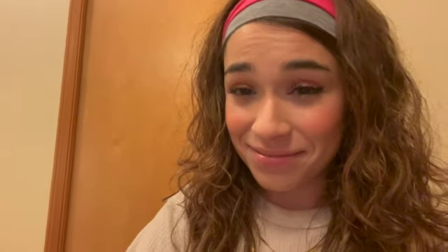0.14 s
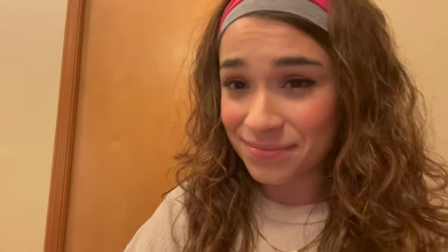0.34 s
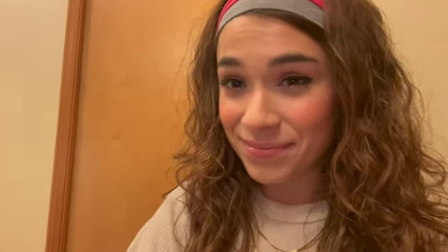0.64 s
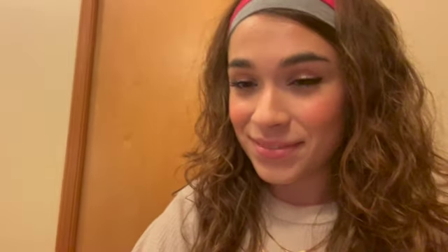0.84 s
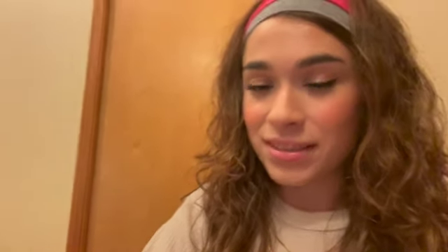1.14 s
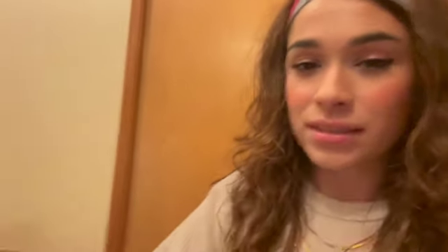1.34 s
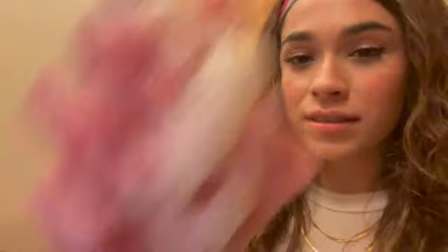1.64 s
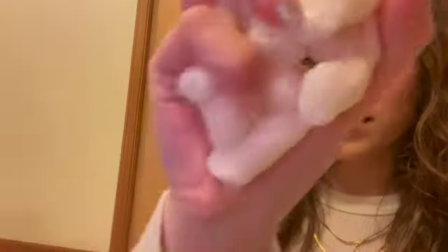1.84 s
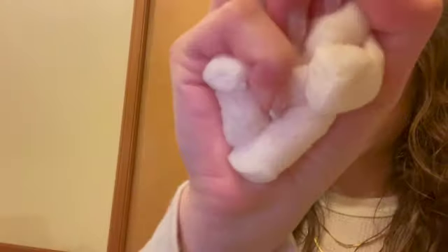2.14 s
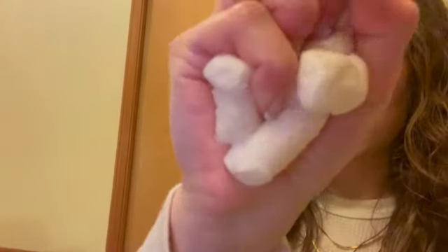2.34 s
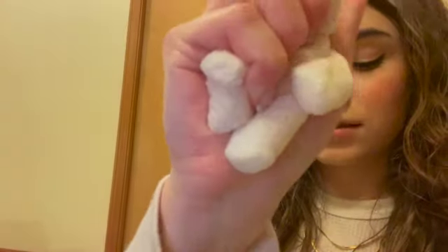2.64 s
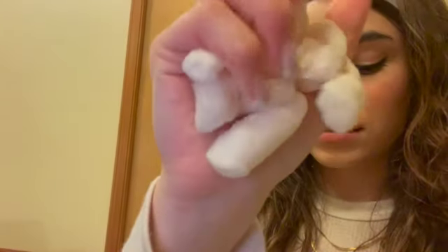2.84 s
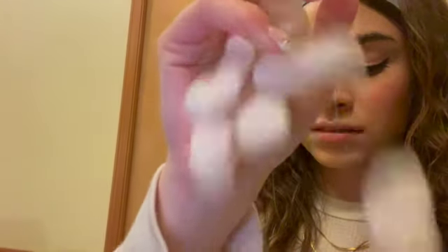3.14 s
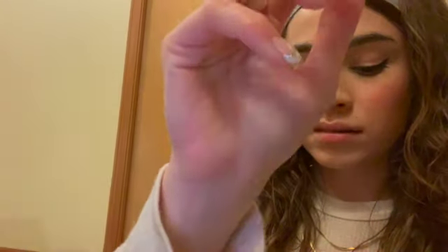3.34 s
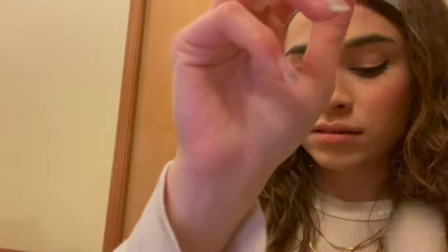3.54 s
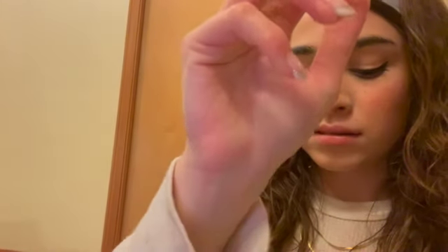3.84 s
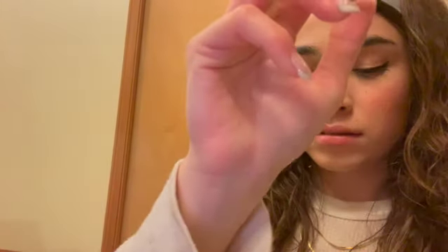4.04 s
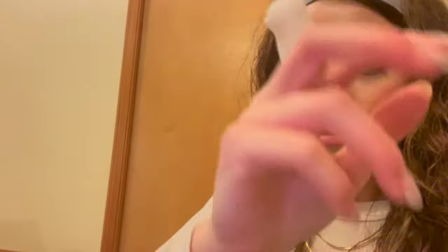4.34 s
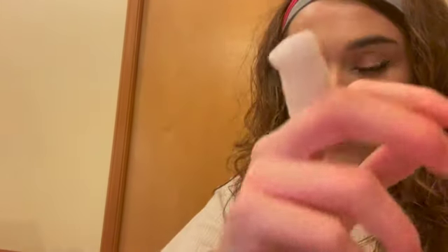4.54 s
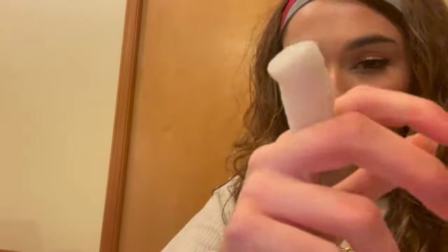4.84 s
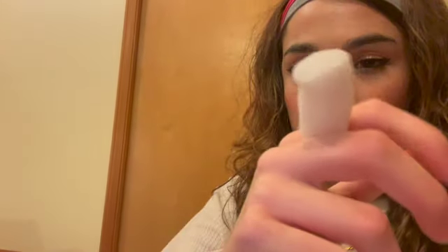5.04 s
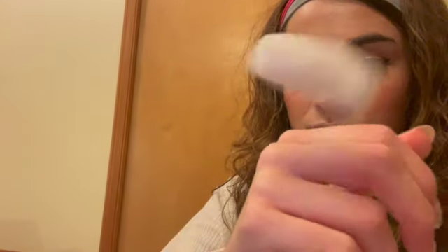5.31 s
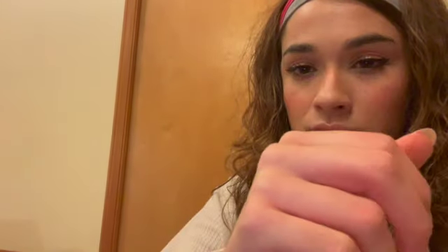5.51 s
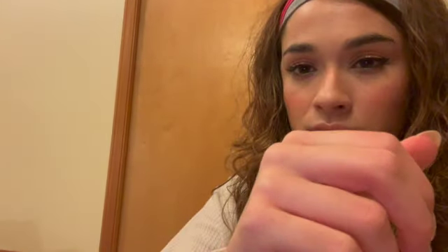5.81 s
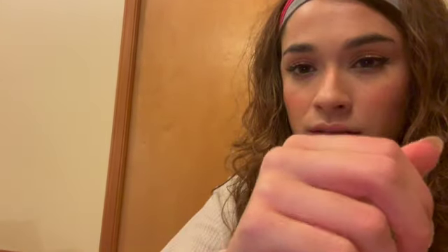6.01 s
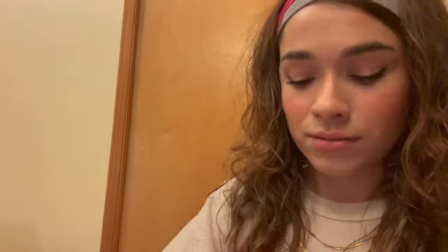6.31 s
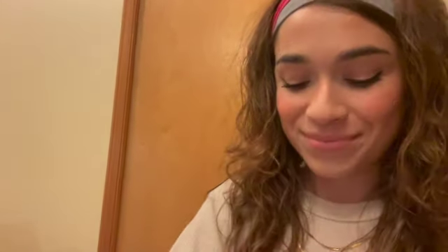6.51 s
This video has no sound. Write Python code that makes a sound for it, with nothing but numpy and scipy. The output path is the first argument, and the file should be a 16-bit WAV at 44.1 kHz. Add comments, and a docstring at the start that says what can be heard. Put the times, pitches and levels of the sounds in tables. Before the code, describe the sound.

Dry, hollow rummaging in a box of light foam pieces comes first, then a handful is crushed right at the microphones, muffled at first and quickly turning into crisp, dense crunching and popping. It eases, and a rapid shower of light pieces taps the cardboard. Quiet follows, with faint brushing, a tiny peel and one hollow tap. A final rustle and soft low table knock end it, over faint hiss in a small indoor room.

```python
"""Crushing foam packing peanuts

A hand rummages in a box of foam peanuts (grains of noise and box modes), lifts a handful to two microphones
and crushes it (dense bright clicks, snaps, a hollow fist). The peanuts drop back as ticks that ring the box;
a last one sticks to the skin, peels off and falls; the hand digs in again and the wrist knocks the table.
Movement adds shaped low noise and a thrum; decaying noise makes the small room, faint hiss its background."""
import sys
import numpy as np
from scipy import signal
from scipy.fft import rfft, irfft
from scipy.io import wavfile

SR = 44100
rng = np.random.default_rng(int(sys.argv[2]) if len(sys.argv) > 2 else 0)


def master(y):
    """Save y as 16-bit WAV."""
    cut = np.clip(np.atleast_2d(y).T, -1, 1)
    pcm = np.round(cut * 32767)  # scale
    wavfile.write(sys.argv[1], SR, pcm.astype(np.int16))


N = 294147


def from_db(db):
    """Decibels to an amplitude factor."""
    return 10 ** (np.asarray(db) / 20)


def rms_one(x):
    """Scales a signal to an RMS of 1."""
    return x / np.sqrt(np.mean(x ** 2) + 1e-20)


def in_time(spans):
    """Columns of several tables on one time line; level is silence between the tables."""
    t = np.arange(N) / SR
    out = np.zeros((len(spans[0][0]) - 1, N))
    out[0] = -140
    for rows in spans:
        s, *columns = np.transpose(rows)
        inside = (t >= s[0]) & (t <= s[-1])
        out[:, inside] = [np.interp(t[inside], s, c) for c in columns]
    return out


def swells(rows):
    """Power of overlapping events that rise to a peak and fall away at steady dB rates."""
    out = np.zeros(N)
    for s, db, *times in rows:
        rise, fall = np.clip(times, .001, 1.5)      # seconds per 10 dB
        first = max(round((s - 6 * rise) * SR), 0)
        last = min(round((s + 6 * fall) * SR), N)
        i = np.arange(first, last)
        tens_of_db_down = np.where(i < s * SR, (s - i / SR) / rise, (i / SR - s) / fall)
        out[i] += 10 ** (db / 10 - tens_of_db_down)
    return out


def colour(x, points):
    """Causal (minimum-phase) filter that follows a spectrum in dB."""
    size = 8192
    hz, level_db = np.transpose(points)
    bin_hz = np.arange(size // 2 + 1) * SR / size
    curve_db = np.interp(np.log(bin_hz + 1), np.log(hz), level_db)
    # folding the cepstrum onto positive time gives the minimum phase
    cepstrum = irfft(curve_db * np.log(10) / 20)
    cepstrum[1:size // 2] *= 2
    cepstrum[size // 2 + 1:] = 0
    response = irfft(np.exp(rfft(cepstrum)))
    response = response.reshape((1,) * (x.ndim - 1) + (-1,))
    return signal.fftconvolve(x, response, axes=-1)[..., :x.shape[-1]]


def tilt(x, bright_db, split_hz):
    """Raises or lowers what lies above the split."""
    low = signal.sosfilt(signal.butter(1, split_hz, fs=SR, output="sos"), x)
    return low + from_db(bright_db) * (x - low)


def drift(rate_hz):
    """Slow random wander of RMS 1: noise through two equal one-pole lowpasses."""
    r = np.exp(-2 * np.pi * rate_hz / SR)
    noise = rng.standard_normal(N + SR)
    return rms_one(signal.lfilter([1], [1, -2 * r, r * r], noise)[SR:])


def ring(clicks, hz, t60):
    """A unit click sets a decaying sine of starting height 1 ringing."""
    r = from_db(-60 / (t60 * SR))
    w = 2 * np.pi * hz / SR
    return signal.lfilter([0, np.sin(w)], [1, -2 * r * np.cos(w), r * r], clicks + 1e-18)


WANDER_S = .0012      # spread of the reading time


def bend(x):
    """Reading a sound at a slowly wandering time bends its pitch by a few per cent."""
    at = np.arange(N) + WANDER_S * SR * drift(4)
    return np.array([np.interp(at, np.arange(N), side) for side in x])


def place(x, lag_s, pan_db):
    """A point source at two microphones: left lags right, with a left-right level difference."""
    shifts = [12 + round(side * lag_s * SR / 2) for side in (1, -1)]
    sides = np.array([np.pad(x, (k, 0))[:len(x)] for k in shifts])
    return sides * from_db([[pan_db / 2], [-pan_db / 2]])


def grains(per_s, grain_db, lag_s, spread_s, spread_db, count=8):
    """Random clicks of uneven size, each from one of several spots between the microphones."""
    steep = np.clip(grain_db, 0, 4) * np.log(10) / 20
    sizes = np.exp(steep * np.minimum(rng.exponential(1, N), 6))
    sizes = sizes * np.sqrt(1.05 - 2 * steep)      # offsets the power that unevenness adds
    clicks = sizes * rng.choice([-1, 1], N) * (rng.random(N) < per_s / SR)
    spot = rng.integers(0, count, N)
    where = np.linspace(-1, 1, count)
    return sum(place(clicks * (spot == k), lag_s + spread_s * w, spread_db * w)
               for k, w in enumerate(where))


def steady(spectrum, apart):
    """Smooth coloured noise: one shared part and a share `apart` of each side's own."""
    white = rng.standard_normal((3, N))
    return rms_one(colour(white[0] + apart * white[1:], spectrum))


# colour of the background hiss: f/Hz, level/dB
AIR_COLOUR = [(18, -38), (30, -10.5), (109, -2.5), (184, -9), (287, -7), (632, -13), (1040, -15.5),
              (1400, -25.5), (2500, -31.5), (4500, -31), (8000, -28), (12500, -28.5), (16000, -49)]
AIR_DB = -76


def air():
    """Steady background hiss: coloured noise, a little more shared than separate on the two sides."""
    return from_db(AIR_DB) * steady(AIR_COLOUR, apart=0.86)


# movement felt at the microphones: t/s, deep rumble level/dB, boxy low-mid level/dB
RUMBLE = [(0.0, -48, -52), (0.2, -60.5, -78), (0.31, -48, -57), (0.41, -58, -87), (0.9, -53, -58),
          (1.06, -58, -69), (1.25, -51, -62.5), (1.45, -57, -63), (1.89, -52.5, -59), (2.64, -66.5, -76),
          (3.07, -59, -73), (3.58, -55, -53.5), (3.9, -58, -70), (3.96, -69, -78.5), (4.6, -75, -79),
          (5.2, -80, -85.5), (5.36, -67.5, -76), (5.89, -65, -71), (6.33, -68, -85), (6.5, -58, -67),
          (6.67, -55, -68)]
# colour of the deep rumble: f/Hz, level/dB
DEEP_COLOUR = [(18, -45.5), (28, -18.5), (40, -1), (59, 4), (108, 0), (190, -11.5), (250, -40), (420, -120)]
# colour of the boxy low mids: f/Hz, level/dB
BOXY_COLOUR = [(150, -36), (220, -9), (300, -0.5), (400, -9.5), (600, -13.5), (1200, -52)]
LUMPS_DB, LUMPS_RATE_HZ = 1, 19      # unevenness of the rumble
# every landing also booms in the box: dB under its peak, time to fall 10 dB
LANDING_BOXY_DB, LANDING_BOXY_FALL_S = -31.5, 0.1


def rumble():
    """Movement as low noise: a deep layer, and boxy low mids that swell with shoves and landings."""
    lumps = np.array([drift(LUMPS_RATE_HZ), drift(LUMPS_RATE_HZ)])
    deep_db, boxy_db = in_time([RUMBLE]) + LUMPS_DB * lumps
    shoved = swells([(s, boxy_peak_db, rise, fall) for s, _, rise, fall, boxy_peak_db in SHOVES])
    landed = swells([(s, db + LANDING_BOXY_DB, .003, LANDING_BOXY_FALL_S) for s, db, *_ in DROPS])
    deep = steady(DEEP_COLOUR, apart=.3) * from_db(deep_db + [[1.2], [-1.2]])
    boxy_gain = np.sqrt(from_db(2 * boxy_db) + shoved + landed)
    boxy = steady(BOXY_COLOUR, apart=.6) * boxy_gain * from_db([[1.0], [-1.0]])
    return deep + boxy


# hand stirring in the box, two passages: t/s, level before tilt/dB, brightness/dB
STIR = [
    [(0.0, -39, -4.5), (0.2, -47.5, -7), (0.37, -46, -4), (0.45, -39, -8), (0.7, -42.5, -11),
     (0.87, -45.5, -3.5), (1.0, -42, -7), (1.1, -44, -2), (1.2, -68, -4.5), (1.3, -51, -1), (1.4, -56.5, 4),
     (1.5, -49.5, 2.5)],
    [(6.28, -75, -0.5), (6.356, -71.5, 3), (6.39, -64.5, 8), (6.66, -62, 4)],
]
# shoves into the heap: t/s, peak level before tilt/dB, time to rise 10 dB/s, time to fall 10 dB/s
# (both times limited to .001-1.5 s), peak level of the boxy low mids/dB
SHOVES = [(0.082, -34.5, 0.025, 0.0872, -70), (0.172, -45, -0.9, 0.19, -70),
          (0.227, -37.5, 0.05, 0.09, -49), (0.29, -34.5, 0, 0.0352, -42), (0.319, -32.5, 0.01, 0.0235, -54),
          (0.544, -38, 0.04, 0.08, -80), (0.59, -39, 0.05, 0.07, -79), (0.622, -52, 0.5, 0.057, -78),
          (0.744, -34, 0, 0.07, -48), (0.764, -35, 0.05, 0.0745, -53), (0.822, -51, -0.34, 0.11, -57),
          (1.08, -49, 0.08, 0.1, -78), (1.132, -32.5, 0.06, 0.0836, -51.5),
          (6.381, -53.5, 0.0283, 0.1, -56.5), (6.552, -57, 0.11, -0.1, -62), (6.626, -53.5, 0.1139, 5, -56)]
# colour of contacts in the heap: f/Hz, level/dB
HEAP_COLOUR = [(110, -46.5), (180, -28), (280, -16.5), (450, -11), (730, -2.5), (1100, -5.5), (1500, -2.5),
               (2600, -3.5), (3000, -6), (5000, -8), (7500, -8.5), (10500, -17), (13000, -17), (16000, -42)]
# modes of the hollow cardboard box, each use varies the level and scales the ring: f/Hz, level/dB, t60/s
BOX = [(300, -6, .05), (430, -7, .04), (545, -2, .05), (640, -4, .035), (735, -2, .035), (845, -3, .035),
       (980, -6, .03), (1150, -6, .03), (1350, -5, .03), (1600, -8, .025), (1910, -8, .025),
       (2170, -8, .02), (2550, -10, .02), (3000, -13, .015), (3900, -15, .012)]
# rustle after every landing, a quick and a slow part: level against the landing's peak/dB (before the
# tick's share and tilt), time to fall 10 dB/s
SETTLE = [(-24, 0.024), (-31.5, 0.17)]
SETTLE_BRIGHT_DB = 5.5
SETTLE_FOLLOWS_TICK = 0.34      # dB per dB of tick: a scuffing landing stirs the heap more than a dull one
BOX_LAG_S = .00007      # arrival at the left microphone after the right
HAND_DAMPS = .6         # share of each box mode's t60 left under the hand


def rummage():
    """Countless soft contacts in the heap; as the hand moves about, other box modes answer."""
    level_db, bright_db = in_time(STIR)
    stirred = np.sqrt(from_db(2 * level_db) + swells([row[:4] for row in SHOVES]))
    settling_power = 0
    for under_db, fall in SETTLE:
        settling_power += swells([(s, db + under_db + SETTLE_FOLLOWS_TICK * tick_db, .001, fall)
                                  for s, db, _, tick_db, *_ in DROPS])
    contacts = colour(grains(5000, 1.3, BOX_LAG_S, .00008, 2.1), HEAP_COLOUR)
    contacts = contacts * from_db(.7 * drift(40))
    hollow = 0
    for hz, db, t60 in BOX:
        wandering_gain = from_db(db + 2.5 * drift(14))
        hollow = hollow + wandering_gain * bend(ring(contacts, hz, t60 * HAND_DAMPS))
    sound = rms_one(rms_one(contacts) + 0.49 * rms_one(hollow)) * from_db([[1.1], [-1.1]])
    stirring = tilt(sound, bright_db, 3000) * stirred
    settling = tilt(sound, SETTLE_BRIGHT_DB, 5200) * np.sqrt(settling_power)
    return stirring + settling


ROOM_T60_S, WALL_CUT_HZ, ROOM_DB = 0.34, 9000, -9.5


def room(x):
    """Decaying noise as the room's answer, one for each microphone, dulled by the walls."""
    t = np.arange(SR // 2) / SR
    answer = rng.standard_normal((2, len(t))) * from_db(-60 * t / ROOM_T60_S) * (t > .004)
    answer = signal.sosfilt(signal.butter(1, WALL_CUT_HZ, fs=SR, output="sos"), answer)
    answer = answer / np.sqrt(np.sum(answer ** 2) / 2)
    return from_db(ROOM_DB) * signal.fftconvolve(x, answer, axes=1)[:, :N]


# peanuts landing: t/s, peak level before panning/dB, pitch of the spot f/Hz, tick level against the
# box ring/dB, left-right level/dB, contact/s, ring length as a multiple of each box mode's t60
DROPS = [(0.742, -28.5, 740, -16, 9, 0.0096, 1.1), (1.343, -34, 1130, -3.5, -4, 0.0043, .9),
         (1.41, -38, 1360, 5, -14, 0.0036, .9), (3.113, -47.5, 980, -7, -6, .003, .9),
         (3.131, -38, 1080, -3, -6, 0.0025, .9), (3.143, -38, 2340, 6, -3, 0.0035, .9),
         (3.173, -41, 3310, 5, -7, 0.0068, .9), (3.194, -24, 870, -3.5, 1, 0.0016, .9),
         (3.273, -36, 900, -9, -4, 0.0022, .9), (3.291, -37, 2900, -1, 0, 0.0028, .9),
         (3.329, -37, 2460, 3, -11, 0.0077, .4), (3.338, -24.5, 840, -9.5, 12, 0.0014, .6),
         (3.345, -34, 403, -15, -2, 0.0027, .9), (3.359, -25.5, 700, -6.5, 6.5, 0.007, 1.2),
         (3.371, -40, 430, -8, 5, 0.0028, .9), (3.377, -30, 754, -14, 7, 0.0027, .9),
         (3.382, -30.5, 880, -2.5, -11, 0.0039, .9), (3.416, -32, 855, -1, -13, 0.006, .9),
         (3.423, -28, 750, -6, 10.5, 0.0031, .8), (3.434, -35, 1470, -18, -6, 0.004, .9),
         (3.484, -34.5, 453, -5.5, -1, 0.0027, .9), (3.52, -34, 2260, 3, -1, 0.0045, .9),
         (3.535, -31.5, 764, 0.5, 3, 0.0086, .9), (3.554, -31, 730, -4, 1, 0.0061, .9),
         (3.563, -33.5, 640, 4.5, 3, 0.0032, .9), (3.577, -33.5, 834, -4, -4, 0.0017, .9),
         (3.646, -37.5, 2300, -1, 1, 0.0046, .9), (3.844, -32, 580, -8.5, 1.5, 0.0027, 1.6),
         (3.872, -42.5, 600, -21.5, -1, 0.0041, 1.2), (3.892, -42, 755, -20, 5, 0.0018, .7),
         (3.919, -50, 600, -19.5, 0, .002, .8), (3.949, -41.5, 2030, 1, -1, 0.0033, 1.8),
         (3.958, -47, 2110, 0, 3, 0.0049, 1.5), (3.964, -45, 902, -5, 0, .002, .9),
         (5.619, -30, 746, 4.5, 1, 0.002, 1.1), (5.637, -43, 650, -5, -5, 0.0056, 1.3),
         (5.652, -39.5, 810, -5, 5, 0.0025, 1.4), (5.665, -42, 804, -12, 0, 0.0049, 1.3),
         (5.677, -48, 865, -8, -3, 0.0033, 1.4), (5.70, -51, 695, -10, 2, 0.0054, 1.4),
         (5.721, -53, 800, 0, 1, 0.0067, 1.1), (5.809, -57, 2560, 9, 2, 0.0036, .9),
         (5.855, -56, 2480, 5, 12, 0.0038, .9), (5.88, -48.5, 2430, 0.5, 0, 0.0037, 1.2),
         (6.363, -37.5, 810, 2, -2, 0.0041, .9), (6.376, -34.5, 800, -6, 8, 0.0056, 1.3),
         (6.385, -35.5, 2420, -1, -5, 0.004, .9)]
# colour of the bare tick: f/Hz, level/dB
SCUFF_COLOUR = [(200, -84.5), (900, -6), (2500, 13), (5000, 1.5), (12500, -9), (16000, -29)]


def drops():
    """A landing is a scuffing tick that strikes the box modes, most strongly near the pitch of its spot."""
    length = 6000
    out = np.zeros((2, N + length))
    t = np.arange(length) / SR
    light = signal.butter(2, 190, "high", fs=SR, output="sos")      # a peanut is too light to push the lows
    for s, peak_db, spot_hz, tick_db, pan_db, contact_s, lasts in DROPS:
        fade = np.exp(-t / np.clip(contact_s, .0008, .02))
        onset = 1 - np.exp(-t / np.clip(.3 * contact_s, .0006, .003))
        shared, *own_side = rng.standard_normal((3, length)) * fade * onset
        # the two microphones see the box from different sides
        tick = signal.sosfilt(light, shared + .9 * np.array(own_side))
        strengths_db = 1.8 * rng.standard_normal((len(BOX), 2, 1))
        detune = np.exp(.025 * rng.standard_normal())      # the shifting heap detunes the walls a little
        hit = 0
        for (hz, db, t60), own_db in zip(BOX, strengths_db):
            gain = from_db(db + own_db - 22 * abs(np.log2(hz / spot_hz)))
            hit = hit + gain * ring(tick, hz * detune, t60 * np.clip(lasts, .3, 4))
        scuff = colour(tick, SCUFF_COLOUR)
        hit = hit / np.abs(hit).max() + from_db(tick_db) * scuff / np.abs(scuff).max()
        i = round(s * SR)
        side_db = peak_db + pan_db * np.array([[.5], [-.5]])
        out[:, i:i + length] += hit / np.abs(hit).max() * from_db(side_db)
    return out[:, :N]


# a low thrum swells while the arm moves: t/s, peak level/dB, time to rise 10 dB/s, time to fall 10 dB/s
THRUMS = [(1.32, -51, .2, 0.14), (3.44, -58, .1, .2), (5.88, -63, 0.14, .08)]
THRUM_HZ, THRUM_STAGE_T60_S = 115.3, 0.19      # t60 of each of two resonators in a row


def thrum():
    """Noise ringing twice over in one low resonance, mostly shared by both microphones."""
    white = rng.standard_normal((3, N))
    once = ring(white[0] + .5 * white[1:], THRUM_HZ, THRUM_STAGE_T60_S)
    twice = ring(once, THRUM_HZ, THRUM_STAGE_T60_S)
    return rms_one(twice) * np.sqrt(swells(THRUMS))


# the fist closes on a handful and opens: t/s, level before tilt/dB, brightness/dB
SQUEEZE = [(1.4, -58, -20), (1.47, -38.5, -25), (1.54, -35, -20.5), (1.596, -32.5, -15.5),
           (1.834, -31.5, -3.5), (1.93, -31.5, -2), (1.96, -35, 4), (2.06, -33, 0), (2.252, -39.5, 1),
           (2.39, -35, 0.5), (2.474, -42.5, 1.5), (2.732, -35, -10), (2.86, -49, -4.5), (3.11, -54, -3.5),
           (3.15, -45.5, 2)]
# the last peanut stretches, tears off the skin and the hiss dies: t/s, level before tilt/dB, brightness/dB
PEEL = [(4.82, -89, 7.5), (4.851, -82.5, 6.5), (5.128, -78.5, 14), (5.166, -43, 10), (5.18, -70.5, -10.5),
        (5.35, -86, -1)]
# foam brushing skin: t/s, peak level before colour and tilt/dB, time to rise 10 dB/s, time to fall 10 dB/s
BRUSHES = [(4.105, -72, .05, .03), (4.235, -74, .03, .03), (4.3, -77, .02, .03), (4.468, -76, .01, .03),
           (4.55, -76, .04, .03), (4.652, -74, .01, .04), (4.78, -78, .08, 0.05), (5.7, -62, 0.05, 0.06),
           (5.81, -64, .05, .08), (5.882, -62, .004, 0.1), (5.96, -66, .07, .035), (5.505, -63, .015, .04),
           (5.545, -66, .04, .018), (5.857, -62, .006, .02)]
# colour of bursting foam cells: f/Hz, level/dB
FOAM_COLOUR = [(120, -54), (300, -17.5), (550, -5.5), (800, -11.5), (1100, -4), (1600, 0), (2300, 1.5),
               (3300, -1.5), (4700, 1), (6300, -1), (8000, -5.5), (10500, -3.5), (13000, -2), (16000, -15)]
# colour of foam brushing skin: f/Hz, level/dB
SKIN_COLOUR = [(800, -6), (1500, -7), (2150, 5), (2900, -7), (4000, 5), (5300, -4), (8000, 0), (12000, -4)]
# colour of the left side against the right: f/Hz, left-right level/dB
HAND_SHADOW = [(60, 9), (240, -5.5), (950, -8), (3770, -5.5), (8000, 1), (15000, 3.5)]
HAND_LAG_S = .00032      # arrival at the left microphone after the right
GRAIN_DB, BRUSH_BRIGHT_DB = 3, -10      # unevenness of the clicks; tilt of the brushing
FIST_HZ, FIST_T60_S, FIST_DB = 1050, .009, -16      # hollow of the closed hand
SURGE_DB, SURGE_RATE_HZ = .8, 14      # uneven pressure


def crush():
    """Dense bursting of tiny cells: bright clicks, with the hollow of the fist ringing along."""
    level_db, bright_db = in_time([SQUEEZE, PEEL])
    cells = rms_one(colour(grains(6500, GRAIN_DB, HAND_LAG_S, .00005, 4.2), FOAM_COLOUR))
    fist_gain = from_db(FIST_DB + 3.6 * drift(4.1))
    fist = fist_gain * rms_one(bend(bend(ring(cells, FIST_HZ, FIST_T60_S))))
    left, right = cells + fist * (np.arange(N) < SQUEEZE[-1][0] * SR)      # no fist once it has opened
    flutter_db = 1.8 * drift(82) + SURGE_DB * drift(SURGE_RATE_HZ)
    sound = np.array([colour(left, HAND_SHADOW), right]) * from_db(flutter_db)
    pressed = tilt(sound, bright_db, 4000) * from_db(level_db)
    brushed = tilt(colour(sound, SKIN_COLOUR), BRUSH_BRIGHT_DB, 2900) * np.sqrt(swells(BRUSHES))
    return pressed + brushed


SMALL_CRACK_DB, SMALL_SPREAD_DB = 4, 3      # above the squeeze's level; random spread to either side
SMALL_LOW_HZ, SMALL_HIGH_HZ = 2200, 13890   # range of ring pitches


def small_cracks(count=110):
    """Random bursts while the fist is closed; louder as it presses harder."""
    s, level_db, _ = np.transpose(SQUEEZE)
    when, size, pitch = rng.random((count, 3)).T
    when = s[0] + when * (s[-1] - s[0])
    peak_db = np.interp(when, s, level_db) + SMALL_CRACK_DB + SMALL_SPREAD_DB * (2 * size - 1)
    ring_hz = SMALL_LOW_HZ * (SMALL_HIGH_HZ / SMALL_LOW_HZ) ** pitch
    return list(zip(when, peak_db, ring_hz))


# the clearest cell bursts and ticks of foam on skin: t/s, peak level before panning/dB, ring f/Hz
CRACKS = [(1.4631, -29, 4390), (1.776, -24, 1200), (1.8544, -20, 9170), (1.872, -16, 8910),
          (1.8788, -16, 11240), (1.9436, -5, 10250), (1.9466, -12, 12830), (1.9494, -12, 10290),
          (1.957, -12, 6290), (1.9895, -11, 7240), (2.0161, -16, 12580), (2.0223, -15, 7020),
          (2.0251, -11, 8570), (2.037, -13, 10420), (2.0549, -11, 7490), (2.0704, -15, 7280),
          (1.898, -21, 2800), (1.9625, -17, 11000), (1.9685, -19, 11500), (1.975, -19, 9500),
          (1.982, -19, 12000), (2.097, -22, 2300), (2.122, -24, 2300), (2.2, -22, 3200), (2.216, -24, 2500),
          (2.232, -24, 3000), (2.2527, -19, 8400), (2.3721, -18, 11460), (2.951, -32, 10980),
          (4.1508, -58, 6890), (4.2356, -60, 6500), (4.302, -60, 3000), (4.3355, -57, 9260),
          (4.4675, -57, 7920), (4.5588, -57, 4910), (4.6506, -50, 2400), (4.71, -61, 7500),
          (5.638, -41, 6720), (5.7524, -52, 8440), (5.8831, -45, 8140), (6.219, -57, 2330),
          (6.3373, -51, 7150)]
CRACK_LOW_SHARE = 0.3      # lower band edge as a share of the ring pitch, kept within 900-6000 Hz
TEAR_S = 0.0005            # time constant of the tearing
CRACK_PAN_DB, CRACK_PAN_SPREAD_DB = -2.5, 2.0      # left-right


def cracks():
    """Each burst is a sharp snap and a millisecond of tearing, bright and with a short ring of its own."""
    length = 400
    out = np.zeros((2, N + length))
    t = np.arange(length) / SR
    for s, peak_db, hz in small_cracks() + CRACKS:
        side, *noise = rng.standard_normal(length + 1)
        low_hz = np.clip(CRACK_LOW_SHARE * hz, 900, 6000)      # the smaller the cell, the fewer lows
        thin = signal.butter(2, [low_hz, 15800], "band", fs=SR, output="sos")
        puff = (t == 0) + .6 * np.array(noise) * np.exp(-t / TEAR_S)
        burst = signal.sosfilt(thin, puff + .2 * ring(puff, hz, .0015))
        burst = burst / np.abs(burst).max() * from_db(peak_db)
        i = round(s * SR)
        out[:, i:i + length] += place(burst, HAND_LAG_S, CRACK_PAN_DB + CRACK_PAN_SPREAD_DB * side)
    return out[:, :N]


BUMP_S, BUMP_DB, BUMP_HZ, BUMP_T60_S = 6.402, -36, 69, 0.2      # the wrist knocks the table
BUMP_PUSH_S = 0.005      # from the start of the push to its peak


def bump():
    """A soft triangular push sets the table's lowest mode swinging."""
    push = np.maximum(1 - np.abs(np.arange(N) / SR - BUMP_S) / BUMP_PUSH_S, 0)
    swing = ring(push, BUMP_HZ, BUMP_T60_S)
    return swing / np.abs(swing).max() * from_db(BUMP_DB)


def scene():
    """Foam and its room, with rumble, thrum, table knock and background hiss left dry."""
    foam = rummage() + drops() + crush() + cracks()
    return air() + rumble() + foam + room(foam) + thrum() + bump()


LOW_CUT_HZ, TOP_CUT_HZ = 32, 16700


def record(dry):
    """The deepest lows roll off, the top is cut steeply."""
    dry = signal.sosfilt(signal.butter(2, LOW_CUT_HZ, "high", fs=SR, output="sos"), dry)
    return signal.sosfilt(signal.cheby2(12, 70, TOP_CUT_HZ, fs=SR, output="sos"), dry)


dry = scene()
out = record(dry)
master(out)
```